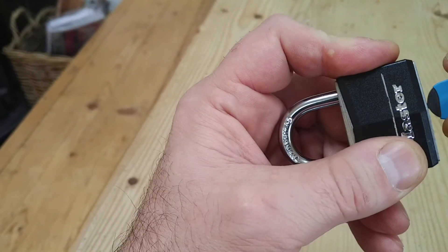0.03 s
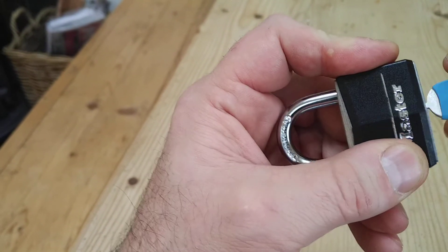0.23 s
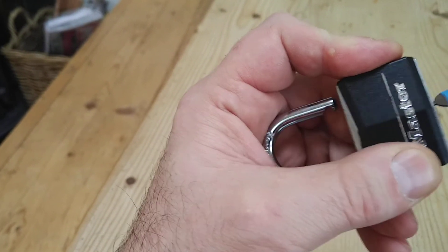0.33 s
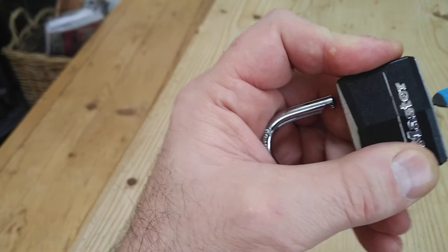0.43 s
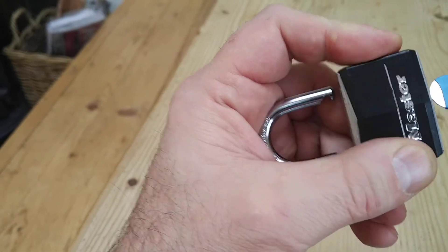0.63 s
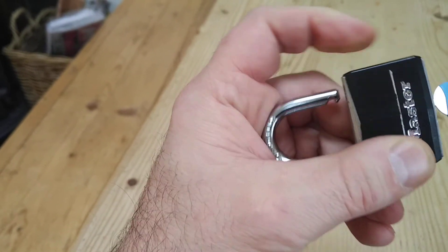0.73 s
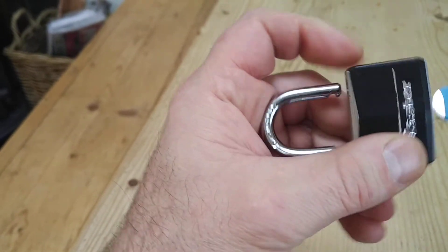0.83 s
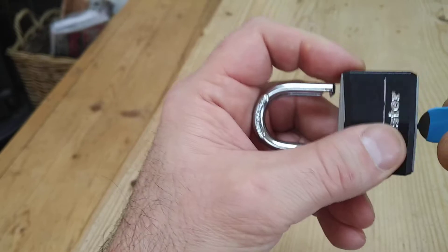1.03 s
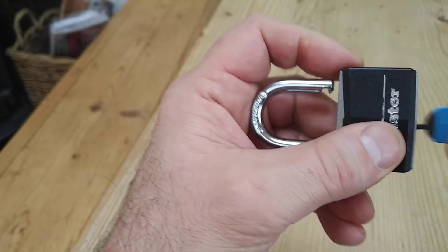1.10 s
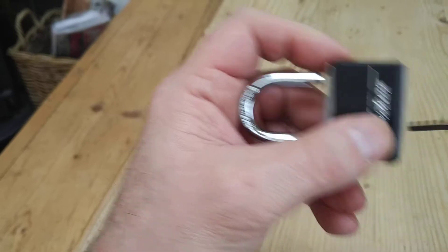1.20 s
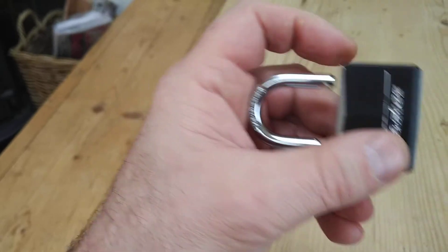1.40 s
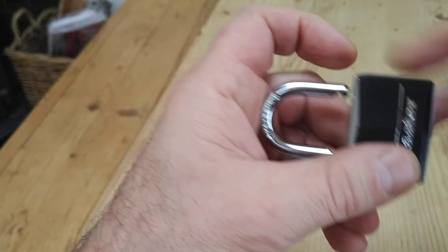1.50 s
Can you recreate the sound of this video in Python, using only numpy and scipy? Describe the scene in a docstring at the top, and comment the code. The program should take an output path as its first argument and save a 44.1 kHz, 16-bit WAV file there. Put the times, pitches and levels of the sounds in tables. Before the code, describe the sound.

A padlock clicks and its shackle springs open with a sharp, briefly ringing snap. The mechanism clicks back, then the key rattles and scrapes lightly. Fingers rub softly on the lock, close to the microphone in a quiet room.

```python
"""A padlock, unlocked in the hand close to a stereo pair of microphones in a quiet, bare room.
The bolt clicks twice, metal chattering on metal and ringing the lock body. The spring throws the
shackle against its stop, where it rings and buzzes, and the hand takes the jolt. Then the mechanism
clicks back and the key rattles and scrapes lightly in the keyway. Fingers rub and knock on the
plastic cover; behind it all sit the room's short tail and a faint hiss."""
import sys
import numpy as np
from scipy import signal
from scipy.fft import rfft, irfft
from scipy.io import wavfile
from scipy.ndimage import uniform_filter1d, map_coordinates

SR = 44100
rng = np.random.default_rng(int(sys.argv[2]) if len(sys.argv) > 2 else 0)


def persist_wave(psi):
    """Save psi, clipped to +-1, as 16-bit WAV."""
    counts = np.round(np.clip(psi, -1, 1) * 32767).astype(np.int16)
    wavfile.write(sys.argv[1], SR, np.atleast_2d(counts).T)


N = 68355
SIZE = 16384  # samples in one event
TICK_T60_S, TICK_SCATTER_DB = 0.007, -6  # light ticks and the grit of the scrape
# narrow ringing tones after the shackle's stop; the highest is a thin whistle, probably the
# microphone's resonance: f/Hz, relative level/dB
RING_TONES = [(3192, -2), (3493, -2.5), (4312, -2), (5706, -0.5), (6157, -1.5), (6485, -0.5), (6700, 0.5),
              (7004, -7), (10923, 7.5), (11312, 0), (15697, 7.5)]


def amp(db):
    """Decibels to gain."""
    return 10 ** (np.asarray(db) / 20)


def along(points, hz):
    """Read (f/Hz, value) points on a log frequency axis."""
    f, values = np.transpose(points)
    return np.interp(np.log(hz + 1), np.log(f + 1), values)


def fader(points):
    """Gain over the whole scene from (t/s, level/dB) points."""
    return amp(np.interp(np.arange(N) / SR, *np.transpose(points)))


def fade(t, t60):
    """Exponential decay, 60 dB down at t60."""
    return np.exp(-np.log(1000) * t / np.maximum(t60, 1e-4))


def axes():
    """Time and frequency axes of one event."""
    return np.arange(SIZE) / SR, np.fft.rfftfreq(SIZE, 1 / SR)


def add(out, start_s, sound, pan_db=0):
    """Mix an event in, fading its second half; positive pan is to the left."""
    start = max(round(start_s * SR), 0)
    ending = np.clip(2 * (1 - np.arange(SIZE) / SIZE), 0, 1) ** 2
    part = (sound * ending * amp([[pan_db / 2], [-pan_db / 2]]))[:, :N - start]
    out[:, start:start + part.shape[1]] += part


def resonance(hz, centre_hz, width_hz):
    """Bell-shaped gain, 1 at the centre."""
    return 1 / (1 + (2 * (hz - centre_hz) / width_hz) ** 2)


def causal(gain):
    """Minimum-phase response with the given gain."""
    cepstrum = irfft(np.log(np.maximum(gain, 1e-6)))
    cepstrum[..., 1:SIZE // 2] *= 2
    cepstrum[..., SIZE // 2 + 1:] = 0
    return np.exp(rfft(cepstrum))


def noise(colour):
    """Steady stereo noise of rms 1, wider toward the treble."""
    # likeness at the two microphones: f/Hz, correlation
    likeness = [(60, 1), (200, 0.53), (1000, 0.5), (5000, 0.18), (12000, .1)]
    hz = np.fft.rfftfreq(2 * N, 1 / SR)
    angle = np.arccos(np.clip(along(likeness, hz), -1, 1)) / 2
    spectra = rfft(rng.standard_normal((2, 2 * N))) * amp(along(colour, hz))
    mid, side = irfft(spectra * [np.cos(angle), np.sin(angle)])[:, :N]
    stereo = np.array([mid + side, mid - side])
    return stereo / stereo.std()


def skin_rub():
    """Skin rubs softly on the lock as it is held."""
    # colour of the friction: f/Hz, relative level/dB
    colour = [(30, -21), (70, -0.5), (200, -2.5), (350, -8), (700, -11.5), (3000, -23), (12000, -27.5)]
    # its rise and fall: t/s, level/dB
    levels = [(0, -73), (.5, -76.5), (.6, -71.5), (0.759, -72), (.87, -64), (1.1, -65.5), (1.3, -71),
              (1.55, -70)]
    return fader(levels) * noise(colour)


def hiss(level_db=-69.5):
    """A faint, steady noise floor."""
    # its colour: f/Hz, relative level/dB
    colour = [(15, -39), (25, -12), (92, -6), (229, -10.5), (326, -7.5), (394, -23.5), (439, -27.5),
              (911, -22), (1190, -29), (5280, -23), (11300, -23), (12900, -25.5), (16000, -18)]
    return amp(level_db) * noise(colour)


def chatter(envelope, likeness=0, smooth_bins=500):
    """Spectrum of a burst of micro-impacts at two microphones, broadly flat and of unit energy."""
    mid, side = rfft(rng.standard_normal((2, SIZE)) * envelope)
    angle = np.arccos(np.clip(likeness, -1, 1)) / 2
    burst = np.cos(angle) * mid + np.sin(angle) * np.array([side, -side])
    power = np.abs(uniform_filter1d(np.abs(burst) ** 2, size=smooth_bins, axis=1))
    return burst * causal(power ** -0.5)


def contact(gain, t60, scatter_db, rise_s=0.00061, scatter_rise_s=0.004):
    """A metal contact chatters briefly, rings the lock body and scatters off the hand."""
    # resonances of the lock body: f/Hz, width/Hz, level/dB
    body_modes = [(330, 400, -22.5), (900, 490, -15.5), (1300, 1300, -17), (1970, 250, -6),
                  (2920, 370, -2.5), (3620, 760, -1.5), (3920, 400, -4), (5710, 1200, -1),
                  (6500, 800, -3.5), (8200, 990, -7.5), (10260, 1500, 3), (11600, 900, -3.5),
                  (13200, 1500, -1), (14700, 800, -7.5), (15600, 450, -2)]
    # likeness of the direct sound at the two microphones: f/Hz, correlation
    likeness = [(1000, 0.7), (3500, 0.85), (7000, .35), (12000, 0.46)]
    t, hz = axes()
    body_power = sum(amp(db) ** 2 / (1 + ((hz * hz - f * f) / (width * hz + 1)) ** 2) ** 1.2
                     for f, width, db in body_modes)
    scatter = chatter(fade(t, t60=0.024) * (1 - np.exp(-t / scatter_rise_s)))
    direct = chatter(fade(t, t60) * (1 - np.exp(-t / rise_s)), along(likeness, hz), smooth_bins=240)
    return irfft((direct + amp(scatter_db) * scatter) * causal(np.sqrt(body_power) * gain))


def light_ticks():
    """Light ticks with a high zing, most of them from the key and pins."""
    # ticks; the second is a faint lead-in just before the first bolt click:
    # t/s, level/dB, treble tilt/(dB per octave), zing/dB
    ticks = [(.1880, -27, -8, -26), (0.2081, -14, -2, -20), (.535, -25, -7, -23), (.584, -27.5, -17.5, -30),
             (0.6254, -34.5, -2, -15.5), (.633, -33.5, -8.5, -22), (0.9376, -25.5, -6, -14),
             (1.0847, -24, 3, 7), (1.0864, -13, 0.5, 0.5), (1.0896, -28, 2, 5), (1.0919, -27.5, 7, 1.5),
             (1.1030, -24.5, -5, -10), (1.1118, -22.5, 3.5, 8.5), (1.1135, -24, 6.5, -5.5),
             (1.121, -26, 3, -7), (1.1290, -24, 4.5, -3), (1.1513, -24, -1.5, 4), (1.158, -39.5, 13.5, -13),
             (1.352, -39.5, -10, -15.5)]
    out, (_, hz) = np.zeros((2, N)), axes()
    zing = resonance(hz, centre_hz=11100, width_hz=1400)
    octaves = np.log2(np.maximum(hz, 3200) / 5000)
    for start_s, db, tilt, zing_db in ticks:
        gain = amp(db + tilt * octaves) * (1 + amp(zing_db) * zing)
        add(out, start_s, contact(gain, TICK_T60_S, TICK_SCATTER_DB), pan_db=-2)
    return out


def bolt_clicks():
    """The bolt clicks hard; each point of contact favours two resonances of its own."""
    # bands in which the contacts differ in strength: f/Hz
    bands = [400, 1000, 3600, 7000, 10300, 13500]
    # hard contacts: t/s, level/dB in each of the six bands, pan/dB, chatter t60/s, scatter/dB,
    # then f/Hz, level/dB of the low resonance and of the high one
    clicks = [(0.2105, 6.5, -8, 9, 4, -1.5, 1.5, 0, 0.005, -10.5, 1830, 3, 4550, 3.5),
              (0.218, -0.5, -4, 10.5, -2, -6.5, -3, -0.5, 0.0045, -12, 960, 1, 2720, -12),
              (0.2196, 0.5, -9, -8, -2, -5.5, -9.5, -8, 0.0034, -2.5, 2000, -4.5, 9400, 0.5),
              (0.82, -6.5, -9.5, -4.5, -19, -10, -8, 3, 0.0064, -19, 630, 1, 15200, -4),
              (0.8218, -5.5, -5.5, 4.5, -3.5, 1.5, -12, -0.5, 0.0042, -11, 1306, -10, 3460, -8.5),
              (0.8276, -21, -7, -11.5, -14, 0.5, -16, -5, 0.0056, -27, 1219, 5, 3410, -9),
              (.8297, -4.5, -3, 1, 0.5, 2.5, 7, -4, 0.005, -10.5, 1240, 8.5, 9760, -2),
              (0.9506, 8, 3, -6, -4.5, -2.5, 7, -1, 0.0049, -12.5, 780, -1, 2120, 1)]
    out, (_, hz) = np.zeros((2, N)), axes()
    for start_s, *levels, pan_db, t60, scatter_db, low_hz, low_db, high_hz, high_db in clicks:
        low = amp(low_db) * resonance(hz, low_hz, width_hz=330)
        high = amp(high_db) * resonance(hz, high_hz, width_hz=540)
        gain = amp(along(list(zip(bands, levels)), hz)) * (1 + low + high)
        add(out, start_s, contact(gain, t60, scatter_db), pan_db)
    return out


def damped_mode(t, hz, db, t60):
    """One decaying sine."""
    return amp(db) * np.sin(2 * np.pi * hz * t) * fade(t, t60)


def hand_jolts():
    """The hand takes the lock's recoil with dull thumps."""
    # jolts: t/s, level/dB, f/Hz, t60/s
    jolts = [(0.227, -43, 63, 0.19), (0.2774, -35, 130, 0.039), (.286, -34.5, 63.9, 0.08),
             (0.324, -54.5, 80.5, 0.24), (0.950, -45.5, 151, 0.054), (0.961, -56.5, 64, 0.12),
             (1.099, -62.5, 62.3, 0.095)]
    out, (t, _) = np.zeros((2, N)), axes()
    onset = 1 - fade(t, t60=0.011)
    for start_s, db, hz, t60 in jolts:
        add(out, start_s, damped_mode(t, hz, db, t60) * onset)
    return out


def shackle(stop_s=0.2798, slide_s=0.013, rise_db=21, slide_db=2, stop_db=0.5, spring_db=4.5):
    """The shackle scrapes out ever faster, hits its stop and rings while the spring buzzes."""
    # colour of the sliding, buzzing steel: f/Hz, level/dB
    steel_colour = [(150, -13), (500, -19), (850, -15), (1400, -14), (2000, -4), (2550, -4), (3200, 2.5),
                    (5000, -9.5), (5700, 6), (6700, 1), (7300, -3.5), (9900, 1.5), (11200, 7),
                    (13500, -4.5), (15600, -2.5), (16100, -16.5)]
    # colour of the crack at the stop: f/Hz, level/dB
    stop_colour = [(150, 0.5), (400, -18), (850, 1), (1350, -9.5), (2000, 9), (2500, 0), (3500, 4.5),
                   (4700, 11.5), (8500, 9.5), (11200, 6.5), (13500, -7), (15600, 8.5)]
    out, (t, hz) = np.zeros((2, N)), axes()
    peaks = sum(amp(db) ** 2 * resonance(hz, f, width_hz=80) for f, db in RING_TONES)
    steel = causal(amp(along(steel_colour, hz)) * np.sqrt(1 + peaks))
    swell = amp(rise_db * np.minimum(t / slide_s, 1)) * (t < slide_s)
    slide = amp(slide_db) * irfft(chatter(swell) * steel)
    impact = chatter(fade(t, t60=0.0027), likeness=0.91, smooth_bins=1000)
    crack = amp(stop_db) * irfft(impact * causal(amp(along(stop_colour, hz))))
    buzz = amp(spring_db) * irfft(chatter(fade(t, t60=0.11)) * steel)
    add(out, stop_s - slide_s, slide, pan_db=-1)
    add(out, stop_s, crack + buzz + after_ring(), pan_db=-1)
    return out


def after_ring(level_db=-44.5, low_t60_s=0.48, half_t60_hz=14000, waver_db=2, wavers_per_s=30):
    """Narrow tones ring on after the stop, each wavering in strength; the high ones die sooner."""
    out, (t, _) = np.zeros((2, SIZE)), axes()
    for hz, db in RING_TONES:
        waver = waver_db * map_coordinates(rng.standard_normal(SIZE), [t * wavers_per_s])
        t60 = low_t60_s / (1 + (hz / half_t60_hz) ** 2)
        out += amp(db + waver) * fade(t, t60) * np.sin(2 * np.pi * (hz * t + rng.random((2, 1))))
    return amp(level_db) * out


def finger_knocks():
    """Fingers knock softly on the plastic cover and ring its damped modes."""
    # knocks: t/s, level/dB
    knocks = [(.357, -51), (0.577, -43), (1.028, -50), (1.108, -43), (1.519, -55.5)]
    # modes of the cover: f/Hz, level/dB, t60/s
    cover_modes = [(486, -2, 0.049), (399, -13.5, 0.11), (885, -14, 0.041)]
    out, (t, _) = np.zeros((2, N)), axes()
    onset = 1 - fade(t, t60=0.022)
    knock = onset * sum(damped_mode(t, *mode) for mode in cover_modes)
    for start_s, db in knocks:
        add(out, start_s, amp(db) * knock)
    return out


def key_scrape(slips_per_s=900, spread_db=4, grit_db=-0.5):
    """The key drags over the pins: a dense run of tiny slips on a smooth rasp."""
    # swell of the scrape: t/s, level/dB
    levels = [(1.07, -90), (1.086, -54), (1.112, -55.5), (1.155, -61), (1.175, -88.5)]
    # colour of the rasp: f/Hz, relative level/dB
    rasp_colour = [(200, -23.5), (600, -8), (1100, 2), (2300, -4.5), (3500, 1.5), (7000, -4), (11000, -2),
                   (15500, -5)]
    slips = (rng.random(N) < slips_per_s / SR) * rng.choice([-1, 1], N)
    slips = slips * amp(spread_db * rng.standard_normal(N))
    grit = signal.fftconvolve(slips[None], contact(1, TICK_T60_S, TICK_SCATTER_DB), axes=1)[:, :N]
    return fader(levels) * (noise(rasp_colour) + amp(grit_db) * grit / grit.std())


def room(sound, build_s=0.0036):
    """The bare room returns a diffuse tail, different at each microphone."""
    # decay of the room: f/Hz, t60/s
    decay = [(200, 0.74), (2500, 0.77), (6000, 0.73), (11000, 0.5), (15000, 0.37)]
    # colour of the tail: f/Hz, relative level/dB
    colour = [(200, -7.5), (1200, -2.5), (2200, -0.5), (6000, -1.5), (11000, 1.5), (15000, -0.5)]
    hz, t, spectra = signal.stft(rng.standard_normal((2, SR)), SR, nperseg=256)
    envelope = fade(t, along(decay, hz)[:, None]) * (1 - np.exp(-t / build_s))
    tail = signal.istft(spectra * envelope * amp(along(colour, hz))[:, None], SR, nperseg=256)[1]
    return signal.fftconvolve(sound, tail / np.linalg.norm(tail[0]), axes=1)[:, :N]


def scene(handling_wet_db=-13, shackle_wet_db=-7):
    """Lock, key and hand up close, with the room and a faint hiss behind."""
    handling = bolt_clicks() + light_ticks() + hand_jolts() + finger_knocks() + key_scrape()
    pop = shackle()
    background = skin_rub() + hiss()
    reverb = amp(handling_wet_db) * room(handling) + amp(shackle_wet_db) * room(pop)
    return handling + pop + reverb + background


def record(dry, low_cut_hz=20, ceiling=0.8, top_hz=15900):
    """The recorder drops the deepest bass, rounds off peaks and cuts steeply at its band limit."""
    hz = np.fft.rfftfreq(2 * N, 1 / SR)
    low_cut = signal.sosfilt(signal.butter(4, low_cut_hz, "high", fs=SR, output="sos"), dry)
    limited = low_cut / (1 + (low_cut / ceiling) ** 6) ** (1 / 6)
    return irfft(rfft(limited, 2 * N) / np.sqrt(1 + (hz / top_hz) ** 160))[:, :N]


dry = scene()
out = record(dry)
persist_wave(out)
```